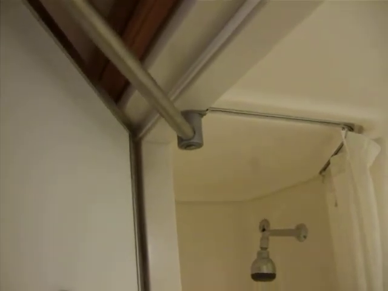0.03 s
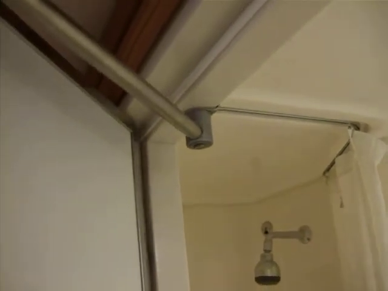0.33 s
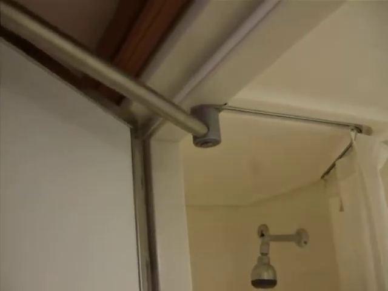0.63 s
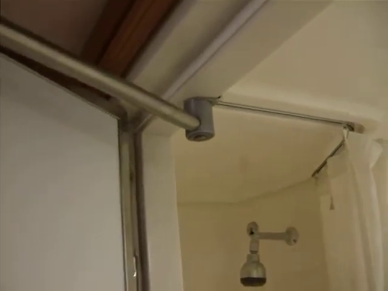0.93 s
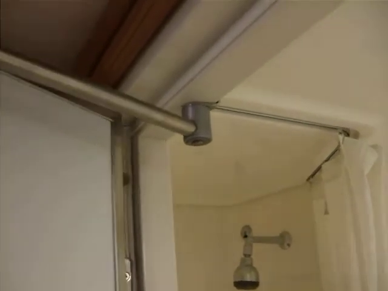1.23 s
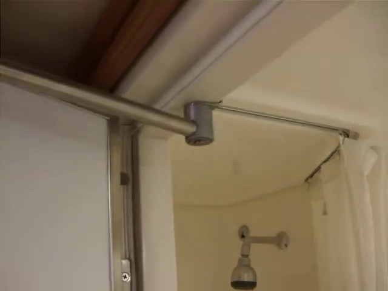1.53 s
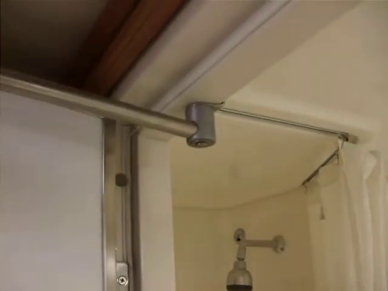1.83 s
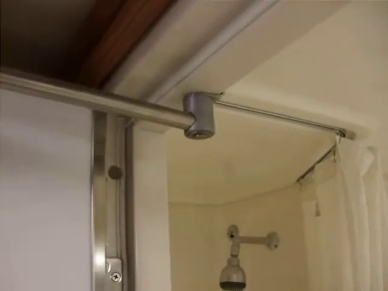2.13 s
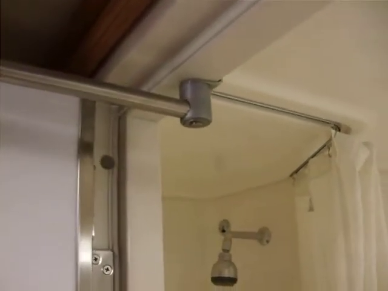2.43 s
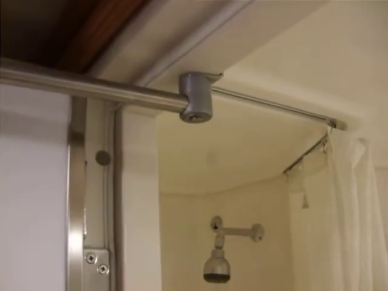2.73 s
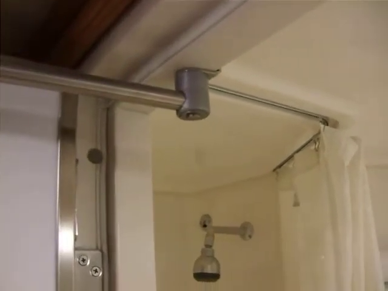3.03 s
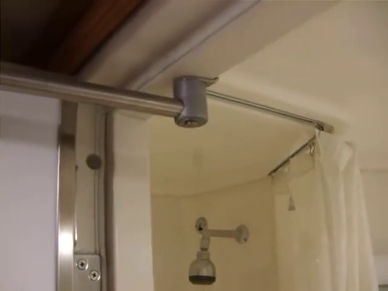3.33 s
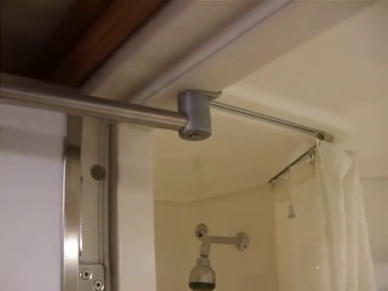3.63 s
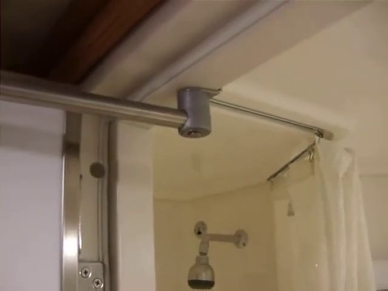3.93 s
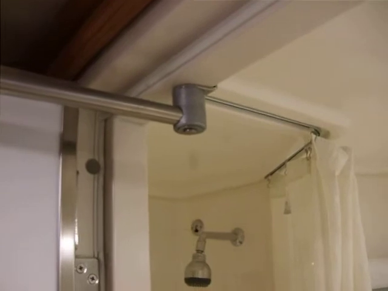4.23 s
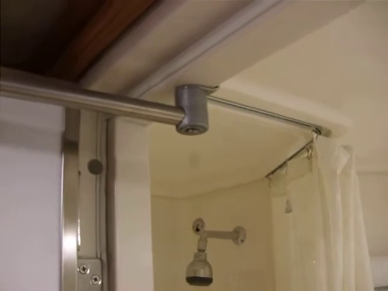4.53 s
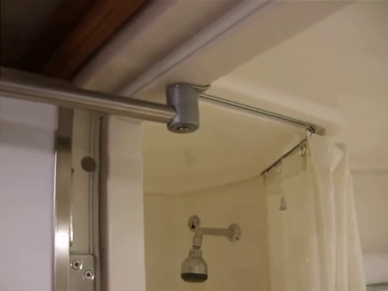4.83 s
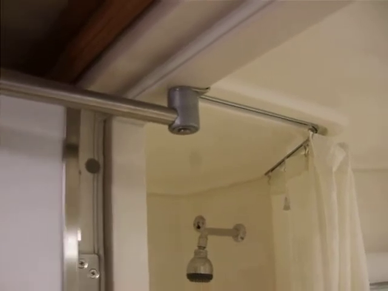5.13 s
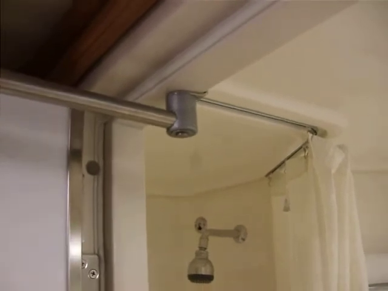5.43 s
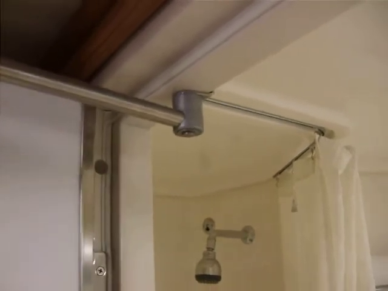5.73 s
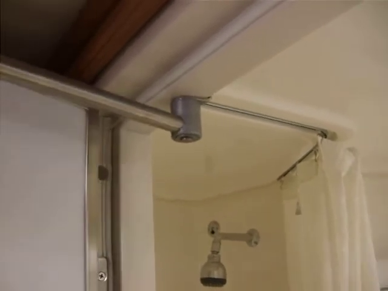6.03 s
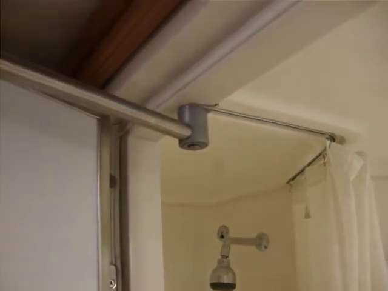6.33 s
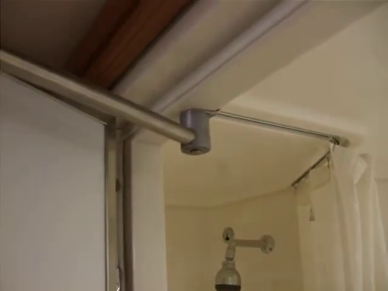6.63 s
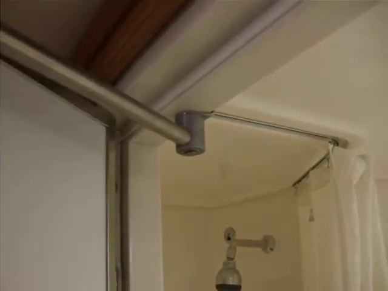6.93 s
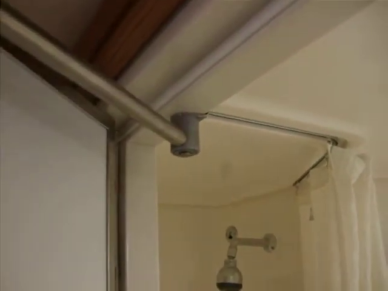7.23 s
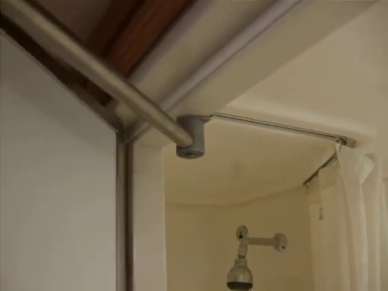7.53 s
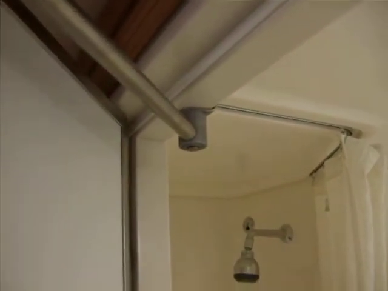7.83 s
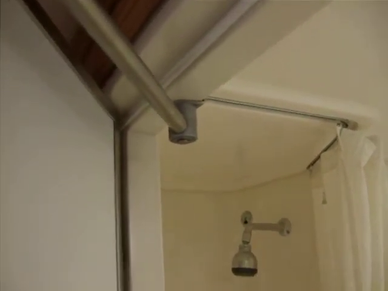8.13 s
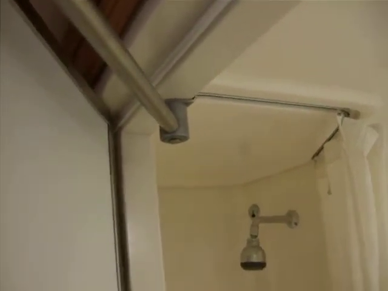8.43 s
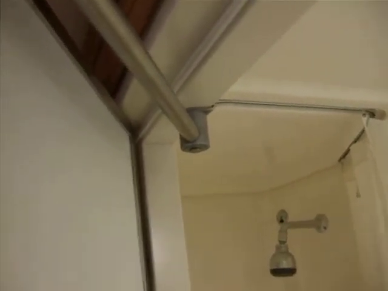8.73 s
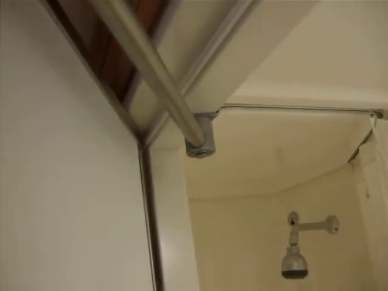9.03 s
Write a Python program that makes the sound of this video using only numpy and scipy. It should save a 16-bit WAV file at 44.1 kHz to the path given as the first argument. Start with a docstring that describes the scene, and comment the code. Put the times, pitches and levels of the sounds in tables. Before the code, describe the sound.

A door closer whines with a buzzy hum as the door swings in a small bathroom, with a dull bump and metallic knocks.

```python
"""A door closer whines as its door swings in a small tiled bathroom. One oscillation makes both
its hum and its buzz, higher and buzzier under strain; a fast shudder of the arm splits the upper
partials. The arm knocks, rattles and ticks in its joint. The door leaf bumps and rubs.
A low 12 Hz handling rumble swells at the bump, and the pitch wobbles with it.
Behind it all lie soft air noise and faint electrical whistles."""
import sys
import numpy as np
from scipy import signal
from scipy.fft import rfft, irfft, next_fast_len
from scipy.io import wavfile

SR = 44100
rng = np.random.default_rng(int(sys.argv[2]) if len(sys.argv) > 2 else 0)


def wav_out(sig):
    """Save sig, one row per channel (or a flat mono array), as 16-bit PCM at SR to the path in sys.argv[1]."""
    wavfile.write(sys.argv[1], SR, np.round(np.clip(np.atleast_2d(sig).T, -1, 1) * 32767).astype(np.int16))


N = 404838
TIME = np.arange(N) / SR


# closer fundamental: (time [s], pitch [Hz])
CLOSER_PITCH = [(0.0, 350.6), (1.05, 351.7), (1.35, 345.7), (1.74, 349.4), (1.9, 370.7), (2.4, 372.7),
                (3.05, 378.2), (3.35, 374.4), (3.9, 373.2), (4.25, 369.7), (4.55, 371.9), (5.0, 369.6),
                (5.7, 370.6), (5.88, 372.6), (6.55, 372.7), (6.88, 367.7), (7.1, 345.9), (7.8, 344.3),
                (8.1, 347.5), (9.18, 349.5)]

def closer(waver_hz=0.325):
    """One oscillation makes hum and buzz; its pitch wobbles with the rumble."""
    (pitch_hz,) = in_time(CLOSER_PITCH)
    state = door_state(pitch_hz)
    wobble = rumble()
    pitch_hz = pitch_hz + 130 * wobble
    phase = phase_of(pitch_hz + waver_hz * drift(12.9))
    return hum(phase, pitch_hz, state, wobble) + buzz(phase, pitch_hz, state)


# door travel: (time [s], opening [0-1])
DOOR_OPENING = [(0, .1), (1, 0.39), (2, 0.66), (3.1, 0.96), (4.4, 0.99), (5.5, 0.82), (7, 0.36), (8, 0.04),
                (9.18, 0.26)]

def door_state(pitch_hz, free_hz=349, strained_hz=370, turn_s=4.08, turn_length_s=1.34):
    """Shares 0-1: strain, opening, closing under strain, closing freely."""
    strain = np.clip((pitch_hz - free_hz) / (strained_hz - free_hz), 0, 1)
    (opening,) = in_time(DOOR_OPENING)
    closing = np.clip((TIME - turn_s) / turn_length_s, 0, 1)
    return strain, opening, closing * strain, closing * (1 - strain)


def level_db(rule, state):
    """Resting level plus what each share of the door state adds."""
    return rule[0] + sum(db * share for db, share in zip(rule[1:], state))


# partials 1-7, resting level and additions:
# (rest [dB], strain [dB], open [dB], closing strained [dB], closing freely [dB])
HUM_LEVELS = [(-46.5, 7, -0.24, 1.5, 3), (-55, 10.5, 3, 0.4, 8.5), (-75.5, 12.5, 15, 0, 2.5),
              (-73, 5.5, 7.5, 2, -0.5), (-73, 10.5, 2.9, 1.8, 5), (-75.5, 7, 12.5, 2, 8),
              (-77.5, 6, 10.5, 3, 7.5)]

def hum(phase, pitch_hz, state, wobble, null_opening=0.368, null_width=0.087):
    """Clean low partials; after the bump the third flares at the second's expense."""
    opening = state[1]
    # at one door angle the second partial cancels against its reflection
    null_db = -6 * np.exp(-((opening - null_opening) / null_width) ** 2)
    flare_db = 5.5 * rumble_envelope() + 90 * wobble
    extra_db = {2: null_db - 0.48 * flare_db, 3: flare_db}
    out = 0
    for k, rule in enumerate(HUM_LEVELS, 1):
        db = level_db(rule, state) + line_gain_db(k * pitch_hz) + extra_db.get(k, 0)
        flicker_db = 0.83 * np.sqrt(k) * drift(6.2)
        out += np.sqrt(2) * from_db(db + flicker_db) * np.sin(k * phase + k * (k - 1))
    return out


# buzz envelope: (time [s], level [dB], treble lift [dB])
BUZZ_LEVELS = [(0.0, -58, -14), (0.6, -53, -12), (1.0, -55.5, -2), (1.22, -52, 3), (1.7, -49, 0),
               (1.95, -41, 2), (2.9, -42, 0.6), (3.2, -38.5, 7), (3.6, -41, 2.5), (4.4, -44, 3),
               (5.1, -39.5, 5.5), (5.7, -39.5, 0.6), (6.4, -42, 1.5), (6.88, -42, 0), (7.15, -53, -3),
               (7.9, -51.5, 2.5), (8.5, -52, 7.5), (9.18, -53, -4)]

def buzz(phase, pitch_hz, state, idle_strain=0.29, wander_hz=2.993, flutter_db=1.02):
    """Rasping upper partials, split by a shudder that quickens with the pitch."""
    strain = idle_strain + (1 - idle_strain) * state[0]
    buzz_db, lift_db = in_time(BUZZ_LEVELS)
    phase = phase + 0.02 * strain * drift(120)  # strain makes the cycles uneven
    upper = upper_partials(phase, strain)
    shudder_hz = 82 + 1.36 * (pitch_hz - 347)
    shudder_phase = phase_of(shudder_hz + wander_hz * drift(24.8))
    side_gain = from_db(-8 + 12.5 * strain)
    rasp = (upper + side_gain * sidebands(phase, shudder_phase)) / np.sqrt(1 + side_gain ** 2)
    rasp = boost_and_cut(bathroom(rasp, wet_db=-4.5, t60_s=0.15, treble_t60_s=0.17))
    rasp = from_db(buzz_db) * lift_treble(rasp, lift_db)
    squeal = squeals(phase, shudder_phase, pitch_hz, state)
    return from_db(flutter_db * drift(35)) * (rasp + squeal)


# upper partial spectra, free and strained: (frequency [Hz], gain [dB])
FREE_SPECTRUM = [(2700, -7.5), (3150, 0), (3500, 1.5), (3850, -5), (4200, 2.5), (4550, 2), (4880, -7),
                 (5220, -2.5), (5600, -16), (6000, -19)]
STRAINED_SPECTRUM = [(2900, -2), (3350, -1), (3720, -11.5), (4100, -0.5), (4450, -2.5), (4830, -1.5),
                     (5200, -5), (5570, -9), (5950, -15.5), (6400, -21.5)]

def upper_partials(phase, strain):
    """Partials 8-17, changing colour with strain; rms 1."""
    partials = fading_sines((k * phase for k in range(8, 18)), flicker_db=2)
    free = coloured(partials, FREE_SPECTRUM)
    strained = coloured(partials, STRAINED_SPECTRUM)
    return unit_rms((1 - strain) * free + strain * strained)


# shudder sideband spectrum: (frequency [Hz], gain [dB])
SIDEBAND_SPECTRUM = [(1400, -21), (2100, -25.5), (2400, -18), (2800, -11.5), (3100, -5.5), (3450, -10.5),
                     (3600, -4), (3950, -4.5), (4200, -6.5), (4360, -1.5), (4570, -11), (4720, -6.5),
                     (5000, -11), (5450, -10.5), (5850, -32.5)]

def sidebands(phase, shudder_phase):
    """The arm's shudder puts a line either side of partials 5-16; rms 1."""
    phases = (k * phase + side * shudder_phase for k in range(5, 17) for side in (-1, 1))
    return coloured(fading_sines(phases, flicker_db=1.5), SIDEBAND_SPECTRUM)


# squeals, resting level and additions:
# (rest [dB], strain [dB], open [dB], closing strained [dB], closing freely [dB])
SIDE_SQUEAL_LEVELS = (-85.5, 4, 31.5, 10, 6.5)
TOP_SQUEAL_LEVELS = (-76, 12.5, 6.5, 0.5, 12)

def squeals(phase, shudder_phase, pitch_hz, state):
    """Two lines stand out: the sideband above partial 12, and partial 14."""
    side_db = level_db(SIDE_SQUEAL_LEVELS, state)
    top_db = level_db(TOP_SQUEAL_LEVELS, state) + line_gain_db(14 * pitch_hz)
    side = from_db(side_db) * fading_sines([12 * phase + shudder_phase], flicker_db=0)
    top = from_db(top_db) * fading_sines([14 * phase], flicker_db=2)
    return np.sqrt(2) * (side + top)


# narrow boosts and cuts in the whine: (centre [Hz], half width [Hz], gain [dB])
BOOSTS_AND_CUTS = [(1122, 14, 4), (1465, 14, -12), (1748, 10, 6), (1850, 9, -9), (2218, 12, -6),
                   (2440, 25, 4), (2587, 17, 11), (3132, 16, 5), (3165, 14, -6), (3325, 25, 6),
                   (3515, 14, 6), (3587, 12, 5), (3615, 14, -6), (3816, 20, 5), (3982, 20, 5),
                   (4072, 18, -4), (4332, 14, -5), (4362, 16, 3), (4560, 22, 4), (4720, 20, 4),
                   (4890, 26, 10), (5145, 26, 8)]

def line_gain_db(hz):
    """Summed boosts and cuts at this frequency."""
    grid_hz = np.arange(SR / 4)
    bells_db = (db * np.exp(-((grid_hz - centre) / width) ** 2) for centre, width, db in BOOSTS_AND_CUTS)
    return np.interp(hz, grid_hz, sum(bells_db))


def boost_and_cut(x, depth=0.8):
    """Single lines swell or fade as they glide through the narrow bands; rms 1."""
    hz = np.arange(1, SR / 4)
    return coloured(x, np.c_[hz, depth * line_gain_db(hz)])


# blows on the arm: (time [s], level [dB], contact cutoff [Hz])
ARM_BLOWS = [(2.675, -28.5, 700), (3.219, -38, 6000), (4.0818, -11, 2400), (4.4029, -17.5, 1980),
             (4.7957, -14.5, 2000), (5.004, -27, 4000)]
# arm and door modes: (frequency [Hz], gain [dB], t60 [s])
ARM_MODES = [(166.2, -14.5, 0.37), (282, -21, 0.062), (396, -3.5, 0.028), (435, -1.5, 0.031),
             (654, -8, 0.038), (784, -13.5, 0.035), (1070, -6, 0.0085), (1815, -13.5, 0.011),
             (2210, -7, 0.0071), (4000, -25, .01)]

def knocks(low_cut_hz=130):
    """Softened blows ring the arm, with the deep bass cut."""
    blows = sum(filtered(click(s, db), "low", hz) for s, db, hz in ARM_BLOWS)
    ringing = filtered(ring(blows, ARM_MODES), "high", low_cut_hz)
    return bathroom(ringing, wet_db=-3, t60_s=0.24, treble_t60_s=0.2)


# runs of bounces: (start [s], level [dB], bounces [count])
BOUNCE_RUNS = [(2.7477, -15, 1), (2.776, -22.5, 7), (4.19, -26, 1), (4.643, -18.5, 1), (4.715, -27, 1),
               (4.9, -25, 1), (5.017, -22.5, 1)]
# joint modes: (frequency [Hz], gain [dB], t60 [s])
JOINT_MODES = [(488, -14.5, 0.08), (659, -2.5, 0.018), (985, -4, 0.011), (1380, -9.5, 0.014)]

def rattles(gap_s=0.0295, loss_db=1.3, contact_hz=1100):
    """The loose joint bounces softly in its play, weaker each time."""
    bounces = sum(click(s + k * gap_s, db - k * loss_db)
                  for s, db, count in BOUNCE_RUNS for k in range(count))
    blows = filtered(bounces, "band", [contact_hz / 2.67, contact_hz])
    return bathroom(ring(blows, JOINT_MODES), wet_db=-0.5, t60_s=0.099, treble_t60_s=0.24)


# metal ticks: (time [s], level [dB], band centre [Hz])
METAL_TICKS = [(2.659, -21.5, 6660), (3.22, -8, 4300), (3.222, -3.5, 2260), (3.237, -18, 6740),
               (3.257, -13, 6460), (4.0807, -2.5, 6160), (4.0816, -4.5, 6360), (4.795, -16, 6500),
               (5.003, -15.5, 6900), (5.099, -28, 6600), (6.2285, -20.5, 5900), (8.095, -24, 2780)]

def ticks(edge_ratio=1.168):
    """Metal snaps on metal: a millisecond of ringing in a broad band."""
    snaps = sum(filtered(4 * click(s, db), "band", [hz / edge_ratio, hz * edge_ratio])
                for s, db, hz in METAL_TICKS)
    return bathroom(snaps, wet_db=-8, t60_s=0.15, treble_t60_s=0.1)


# bumps of the leaf: (time [s], level [dB])
LEAF_BUMPS = [(3.077, -29.5), (3.091, -26), (3.134, -35), (3.165, -37.5), (3.222, -30), (3.246, -38.5)]
# leaf modes: (frequency [Hz], gain [dB], t60 [s])
LEAF_MODES = [(55, -26, 0.23), (93.7, -8.5, 0.47), (137, -4.5, 0.26), (170.4, 4, 0.31), (227, -5, 0.22)]

def bumps():
    """Dull blows ring the low modes of the door leaf."""
    return ring(sum(click(s, db) for s, db in LEAF_BUMPS), LEAF_MODES)


# rubs of the leaf: (peak time [s], level [dB], hold [s], fall [dB/s])
LEAF_RUBS = [(3.038, -32, 0.055, 174), (3.221, -28.5, 0.01, 192)]
# friction spectrum: (frequency [Hz], density [dB])
RUB_SPECTRUM = [(100, 3.5), (400, -4), (800, -1.5), (1500, -12.5), (2500, -14), (4500, -22.5),
                (8000, -26.5)]

def rubs(grain_db=2.5):
    """The leaf rubs as it bumps: short swells of grainy noise."""
    grain = from_db(grain_db * drift(120))
    pressure = sum(swell(*row, rise_db_per_s=1800) for row in LEAF_RUBS)
    return pressure * grain * coloured(rng.standard_normal(N), RUB_SPECTRUM)


RUMBLE_PEAK_S = 3.135

def rumble(rate_hz=11.7, floor_db=-47.5, peak_db=-29.5):
    """Low handling rumble: a faint tremor that swells at the bump."""
    size = np.maximum(from_db(floor_db), from_db(peak_db) * rumble_envelope())
    return np.sqrt(2) * size * np.cos(2 * np.pi * rate_hz * (TIME - RUMBLE_PEAK_S))


def rumble_envelope():
    """Rise and decay around the bump, 0-1."""
    return swell(RUMBLE_PEAK_S, db=0, hold_s=0.17, fall_db_per_s=35, rise_db_per_s=200)


# room air spectrum: (frequency [Hz], density [dB])
AIR_SPECTRUM = [(20, 12.5), (35, 8.5), (52, -8.5), (82, 5), (115, -6), (170, 1), (250, 1), (400, -4),
                (560, -5), (850, -0.5), (1400, -11.5), (2500, -12.5), (5000, -15), (7500, -16.5),
                (8500, -26.5)]
# electrical whistles: (frequency [Hz], level [dB])
WHISTLE_TONES = [(7860, -72), (7887, -73), (8113, -75), (8140, -76)]

def room_tone(air_db=-44.5):
    """Soft air noise with thin, steady electrical whistles."""
    whistles = sum(from_db(db) * np.sin(2 * np.pi * hz * TIME) for hz, db in WHISTLE_TONES)
    return from_db(air_db) * coloured(rng.standard_normal(N), AIR_SPECTRUM) + np.sqrt(2) * whistles


def bathroom(x, wet_db, t60_s, treble_t60_s, split_hz=1500):
    """Direct sound plus dense reflections off near walls, decaying in two bands."""
    t = np.arange(SR // 2) / SR
    noise = rng.standard_normal(len(t))
    low = filtered(noise, "low", split_hz)
    tail = low * from_db(-60 * t / t60_s) + (noise - low) * from_db(-60 * t / treble_t60_s)
    tail *= t > 0.003  # first reflection
    return x + from_db(wet_db) * signal.fftconvolve(x, tail / np.sqrt(np.sum(tail ** 2)))[:N]


def fading_sines(phases, flicker_db):
    """Reflections off the moving door give each sine its own phase offset and fading."""
    return sum(from_db(flicker_db * drift(4.4)) * np.cos(p + rng.uniform(0, 2 * np.pi)) for p in phases)


def lift_treble(x, lift_db, split_hz=4130):
    """Tilt the treble against the rest at roughly constant power."""
    treble = signal.sosfiltfilt(signal.butter(6, split_hz, "high", fs=SR, output="sos"), x)
    gain = from_db(lift_db)
    return (gain * treble + x - treble) / np.sqrt((1 + gain ** 2) / 2)


def ring(blows, modes):
    """Blows excite decaying sines."""
    out = 0
    for hz, db, t60_s in modes:
        radius = np.exp(-np.log(1000) / (t60_s * SR))
        angle = 2 * np.pi * hz / SR
        feedback = [1, -2 * radius * np.cos(angle), radius ** 2]
        out += from_db(db) * signal.lfilter([0, np.sin(angle)], feedback, blows + 1e-18)
    return out


def click(s, db):
    """One impulse."""
    return from_db(db) * (np.arange(N) == round(s * SR))


def swell(peak_s, db, hold_s, fall_db_per_s, rise_db_per_s):
    """Gain that rises, holds and dies away."""
    before_s = np.maximum(peak_s - TIME, 0)
    after_s = np.maximum(TIME - peak_s - hold_s, 0)
    return from_db(db - rise_db_per_s * before_s - fall_db_per_s * after_s)


def drift(rate_hz, hop=40):
    """Smooth random wander; rms 1."""
    pole = np.exp(-2 * np.pi * rate_hz * hop / SR)
    noise = rng.standard_normal(N // hop + 2002)
    slow = signal.lfilter([1], [1, -2 * pole, pole ** 2], noise)[2000:]
    return np.interp(np.arange(N) / hop, np.arange(len(slow)), unit_rms(slow))


def coloured(x, spectrum):
    """Shape by (frequency [Hz], gain [dB]) points; rms 1."""
    hz, db = np.transpose(spectrum)
    size = next_fast_len(N)
    bins_hz = np.maximum(np.fft.rfftfreq(size, 1 / SR), 1)
    gain = from_db(np.interp(np.log(bins_hz), np.log(hz), db))
    return unit_rms(irfft(rfft(x, size) * gain, size)[:N])


def filtered(x, kind, hz):
    """Filter with 12 dB/octave skirts."""
    return signal.sosfilt(signal.butter(2, hz, kind, fs=SR, output="sos"), x + 1e-18)


def in_time(rows):
    """Each value column of a time table, per sample."""
    times_s, *columns = np.transpose(rows)
    return [np.interp(TIME, times_s, column) for column in columns]


def phase_of(hz):
    """Running phase of a moving frequency."""
    return 2 * np.pi * np.cumsum(hz) / SR


def unit_rms(x):
    """Scale to rms 1."""
    return x / np.sqrt(np.mean(x ** 2) + 1e-20)


def from_db(db):
    """Decibels to gain."""
    return 10 ** (np.asarray(db) / 20)


def scene():
    """Closer, arm, leaf, rumble and room in mono."""
    return (closer() + knocks() + rattles() + ticks() + bumps() + rubs() + rumble() + room_tone())[None]


def record(dry):
    """Steep low-pass at 8.3 kHz."""
    return signal.sosfilt(signal.cheby1(12, 0.1, 8300, fs=SR, output="sos"), dry)


dry = scene()
out = record(dry)
wav_out(out)
```